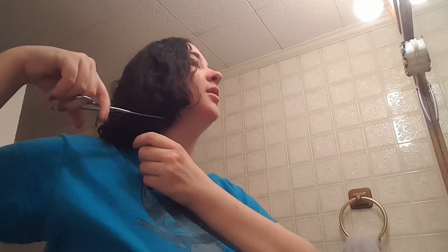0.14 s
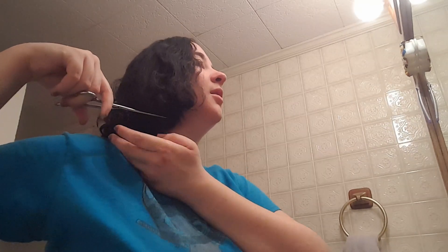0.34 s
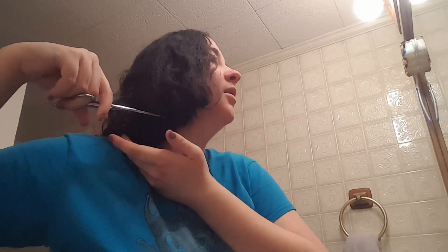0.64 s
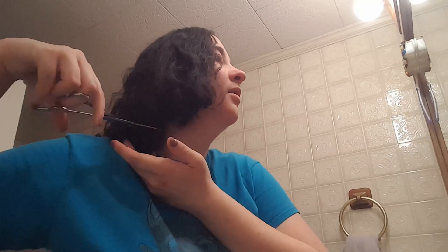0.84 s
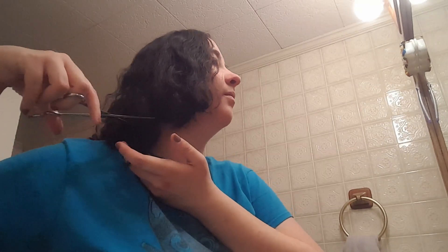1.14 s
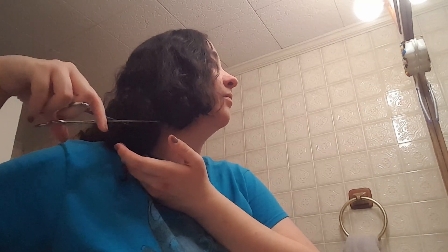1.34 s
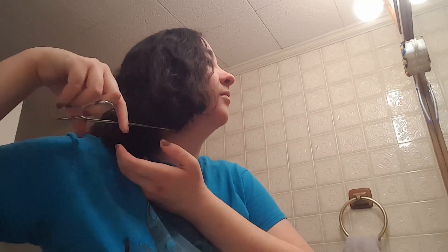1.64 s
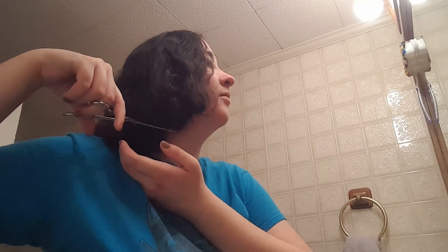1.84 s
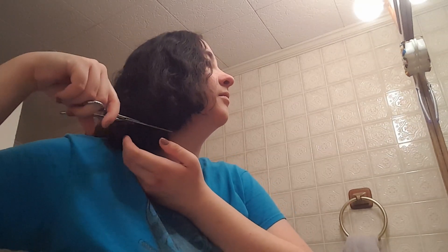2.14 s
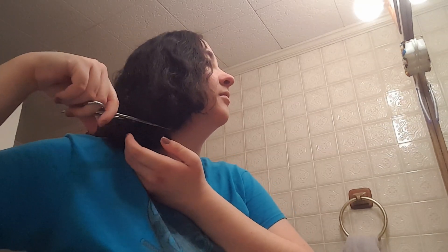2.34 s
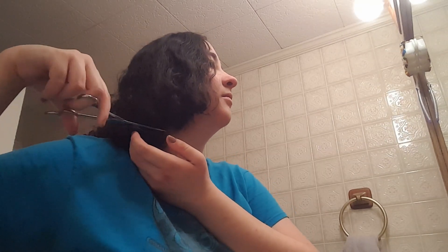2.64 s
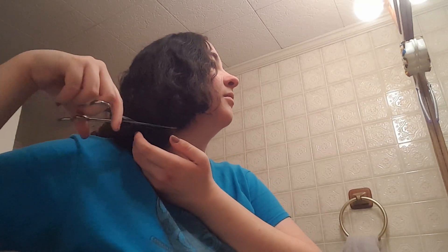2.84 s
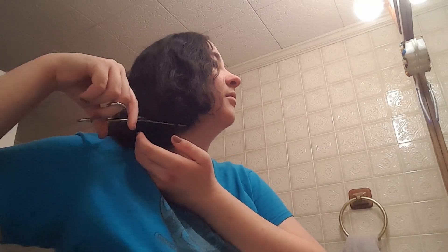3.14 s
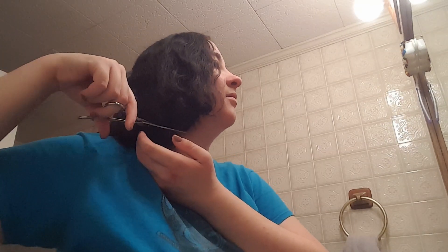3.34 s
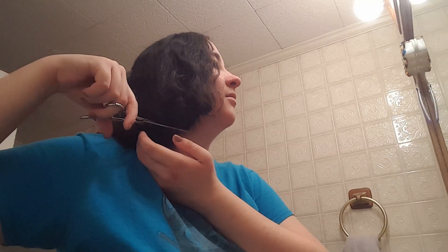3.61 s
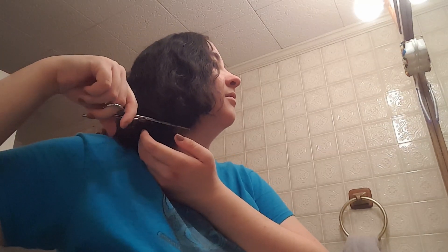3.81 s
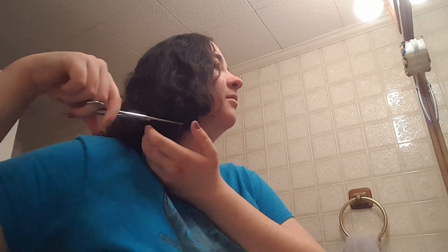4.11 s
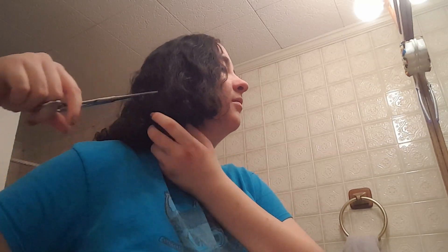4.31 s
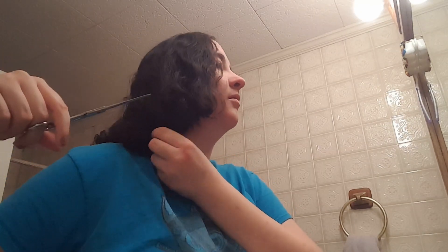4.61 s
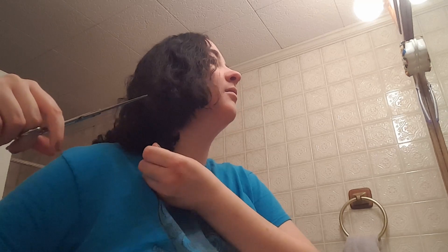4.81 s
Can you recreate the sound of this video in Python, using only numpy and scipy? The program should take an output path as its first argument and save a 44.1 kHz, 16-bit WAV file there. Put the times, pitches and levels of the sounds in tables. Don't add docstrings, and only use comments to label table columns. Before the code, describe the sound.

A quiet small tiled bathroom, with soft steady hiss and very faint low mains hum. From about 0.05 s scissor blades scrape into hair right by the microphone, a thin, bright, uneven crackle of parting strands, catching and growing until a firm metallic snap at 0.65 s. The blades reopen with a light scrape at 0.8-0.95 s, ending in a small pivot click near 0.9 s. From 1.1 s the open blades slide softly over hair while a sleeve rustles low. A second crunching close starts at 1.8 s and ends in the hardest snap at 2.3 s, with brief tile echo. Faint reopening and tiny clicks come around 2.65 s, then near quiet. A slight slide at 3.3-3.5 s leads to a quick rasp and a lighter snap at 3.8 s. Cloth shifts as the arm lowers; two soft, grainy finger brushes through curls follow at 4.2 and 4.6 s, fading out.

```python
import sys
import numpy as np
from scipy import signal
from scipy.fft import rfft, irfft, next_fast_len
from scipy.io import wavfile
from scipy.ndimage import uniform_filter1d

SR = 44100
rng = np.random.default_rng(int(sys.argv[2]) if len(sys.argv) > 2 else 0)


def ratio(d):
    e = np.asarray(d, float) / 20
    return 10 ** e


def transcribe(signal):
    frames = np.atleast_2d(signal).T
    limited = np.clip(frames, -1, 1)
    pcm = np.round(limited * 32767).astype(np.int16)
    wavfile.write(sys.argv[1], SR, pcm)


N = 219088


def evened(x):
    return x / np.sqrt(np.mean(x ** 2) + 1e-20)


def read(points, hz):
    f, value = np.transpose(points)
    return np.interp(np.log(hz + 1), np.log(f + 1), value)


def colour(x, points):
    gain_db = np.maximum(read(points, abs(np.fft.fftfreq(4096, 1 / SR))), -100)
    log_gain = np.log(ratio(gain_db))
    phase = -signal.hilbert(log_gain).imag
    taps = np.fft.ifft(np.exp(log_gain + 1j * phase)).real[:2048]
    return signal.oaconvolve(x, taps[None] / np.linalg.norm(taps), axes=1)[:, :N]


def band(points, lo, hi):
    hz = np.geomspace(50, 17000, 200)
    outside = (hz < lo) | (hz > hi)
    return np.transpose([hz, read(points, hz) - 60 * outside])


def drift(count, hz):
    size = next_fast_len(N)
    steps = rfft(rng.standard_normal((count, size)))
    slowed = steps / (1 + (np.fft.rfftfreq(size, 1 / SR) / hz) ** 4)
    return evened(irfft(slowed, size)[:, :N])


def swells(rows, rise_s, sag_db):
    t, out = np.arange(N) / SR, 0
    for start, length, db in rows:
        sag = sag_db * np.clip((t - start) / length, 0, 1)
        edge = np.clip(np.minimum(t - start, start + length - t) / rise_s, 0, 1)
        out = out + ratio(db + sag) * edge ** 2
    return out


def glide(x, hz, width):
    turn = np.exp(2j * np.pi * np.cumsum(hz) / SR)
    r = np.exp(-1.5 * np.pi * width / SR)
    gain = np.sqrt(2 * (1 - r * r) ** 3 / (1 + r * r))
    return gain * (turn * signal.lfilter([1], [1, -2 * r, r * r], x / turn)).real


def ring(x, modes, aim_db):
    t, body = np.arange(4096) / SR, np.zeros((2, 4096))
    for hz, width, db in modes:
        phase = rng.uniform(0, 2 * np.pi, (2, 1))
        aim = aim_db * rng.uniform(-1, 1) * np.array([[1], [-1]])
        decay = width * np.exp(-np.pi * width * t)
        body += ratio(db + aim) * decay * np.sin(2 * np.pi * hz * t + phase)
    return signal.oaconvolve(x, body / np.linalg.norm(body) * np.sqrt(2), axes=1)[:, :N]


# freq_hz, level_db (per Hz)
HISS_TONE = [(12, -27.5), (25, -13), (50, -2), (80, 0), (160, 0.5), (250, -1), (500, -4.5), (1000, -8.5),
             (2000, -10.5), (4000, -16.5), (8000, -22.5), (10500, -23.5), (13000, -19.5), (15700, -18)]
# freq_hz, likeness (-1 to 1)
PORT_LIKENESS = [(60, 0.056), (180, 0.26), (550, -0.26), (1650, 0.06), (4970, 0.18), (15000, -0.32)]


def hiss(level_db=-63.5):
    frames, hz = N // 256 + 5, np.fft.rfftfreq(1024, 1 / SR)
    a, b, c, d, patches = rng.standard_normal((frames, 513, 5)).T
    patches = evened(uniform_filter1d(uniform_filter1d(patches, 12, 0), 14, 1))
    same = np.clip(read(PORT_LIKENESS, hz), -1, 1)[:, None]
    left = a + 1j * b
    right = same * left + np.sqrt(1 - same ** 2) * (c + 1j * d)
    spectra = np.array([left, right]) * ratio(read(HISS_TONE, hz)[:, None] + .8 * patches)
    return ratio(level_db) * evened(signal.istft(spectra, nperseg=1024, noverlap=768)[1][:, :N])


# freq_hz, level_db (rms), waver_db, waver_hz
MAINS_LINES = [(60, -75, 3.5, .6), (120, -64, 2.2, 1.8)]


def hum():
    out = np.zeros(N)
    for hz, db, waver_db, waver_hz in MAINS_LINES:
        swell, bend = drift(2, 6)
        phase = 2 * np.pi * np.cumsum(hz + waver_hz * bend) / SR
        out += ratio(db + waver_db * swell) * np.sqrt(2) * np.sin(phase)
    return out * ratio(np.array([[.2], [-.2]]))


def blades(drive, modes, wander, bend=.012, fickle_db=3.0):
    near_drive = uniform_filter1d(1. * (abs(drive) > 1e-6), 2001)
    at = np.flatnonzero(near_drive > 1e-4)
    share = np.array([ratio(db) * np.sqrt(width) for hz, width, db in modes])
    out = np.zeros((2, N))
    for (hz, width, db), part in zip(modes, share / np.linalg.norm(share)):
        pull, swell = np.roll(wander, rng.integers(N), 1)[:, at]
        tone = part * glide(drive[at] * ratio(fickle_db * swell), hz * (1 + bend * pull), width)
        out[:, at] += [np.roll(tone, rng.integers(10, 40)), tone]
    return out


# time_s, pressure_db, reach (contact point, pivot 0 to tip 1)
BLADE_STROKES = [
    [(.05, -82, 0), (.157, -79, 0.17), (.3, -65, 0.34), (.35, -67.5, 0.82), (.42, -59, .4),
     (.524, -61, 0.77), (.582, -66.5, 0.8), (.632, -57.5, 1), (.64, -47.5, 0.83), (.6495, -35, 0.53)],
    [(.8, -78, 0.58), (.87, -72.5, 0.43), (.91, -78, 0.56), (.96, -104, .5)],
    [(1.1, -83.5, .5), (1.4, -80, 0.53), (1.8, -80, .5)],
    [(1.8, -78, 0.43), (1.86, -69, 0.22), (1.97, -59, 0), (2.08, -58.5, .5), (2.162, -54, 0.4),
     (2.232, -63.5, 0.65), (2.284, -53.5, 0.82), (2.2965, -36.5, 1.1)],
    [(2.6, -83.5, 0.6), (2.64, -75.5, 0.44), (2.69, -77, 0.42), (2.73, -102, .5)],
    [(3.26, -83.5, .5), (3.38, -82, 0.46), (3.48, -85, .5)],
    [(3.63, -104, 0.53), (3.65, -66.5, 0.61), (3.715, -69, 0.34), (3.754, -87, .6), (3.775, -66, .6),
     (3.797, -57.5, 0.9), (3.8175, -36.5, 0.72)],
]
# opening (1) or closing (0), then handle loops_db, first_mode_db, second_mode_db,
# high_modes_db (re the middle modes at half reach)
STROKE_GRIP = [(0.48, -9.5, -1, -3, -2.5), (.87, -4, 7.5, -3.5, -2.5), (1, 3.5, -4, -5, -2),
               (0.23, -20, -3, -2, -0.5), (0.97, 4, 7.5, 3, -2), (1, -3.5, -0.5, -19, -5),
               (0.2, -7, 4, 1.5, -1)]
# loops_db, first_mode_db, second_mode_db, high_modes_db
REACH_TILT = [-15, -8.5, 6, 4.5]
# time_s, jump_db, fade_s
EDGE_SLIPS = [(0.113, 13, 0.041), (.161, 14, 0.013), (.183, 8, 0.011), (0.234, 11.5, .03),
              (0.352, 11, .012), (0.369, 8.5, 0.056), (0.469, 9.5, 0.0093), (0.526, 13.5, 0.013),
              (0.56, 13, 0.018), (.585, 15, 0.015), (.609, 9.5, 0.047), (0.835, 9, 0.025),
              (1.986, 10.5, 0.01), (2.005, 4, 0.013), (2.031, 5.5, 0.023), (2.082, 6.5, 0.0067),
              (2.115, 9, 0.029), (2.168, 5.5, 0.0059), (2.221, -3, 0.0074), (2.234, 15, 0.039),
              (2.612, 13.5, 0.021), (3.299, 16.5, 0.016), (3.338, 17.5, .02), (3.382, 18, 0.022),
              (3.643, 9, 0.0071), (3.65, 9, 0.0093), (3.685, 11, 0.0067), (3.7, 17, 0.0065),
              (3.756, 19, 0.009), (3.773, 8.5, 0.0089)]
# freq_hz, width_hz, level_db
HANDLE_LOOPS = [(990, 85, -3), (1146.4, 40, -1.5)]
# freq_hz, width_hz, level_db
CLOSING_MODES = [
    [(2250, 130, -7), (2560, 170, 0), (2750, 110, -2)],
    [(3490, 130, 0)],
    [(5400, 200, -8), (6150, 250, 1), (7350, 200, -2), (8450, 200, -3), (8850, 150, -2), (9550, 200, -6)],
    [(11550, 150, -10), (13100, 200, -4), (13650, 200, 0), (14150, 200, -3), (15000, 300, -4)],
]
# freq_hz, width_hz, level_db
OPENING_MODES = [
    [(2520, 120, -3), (2670, 100, 0)],
    [(3470, 120, 0)],
    [(4400, 300, -6), (6070, 140, 3), (6500, 300, -9), (7200, 300, -9), (8200, 250, -5), (9450, 150, -7)],
    [(11800, 200, 0), (13000, 300, -4), (14200, 400, -3), (15200, 300, -3)],
]
GROUP_EDGES = [0, 3100, 4300, 10600, 20000]
DIRECT_GRIT = [-6, -8, -2.5, -4]
# freq_hz, level_db (per Hz)
GRIT_TONE = [(500, -32), (1000, -17.5), (1600, -18), (2500, -5.5), (3100, -13), (3500, -9), (4300, -12.5),
             (5100, -13.5), (6300, -9), (8800, -9), (10700, -20), (11700, -7.5), (15300, -10.5),
             (15900, -36.5)]
# start_s, end_s, from_hz, to_hz, level_db (re high modes)
TIP_GLIDES = [(.11, .3, 11700, 11600, 1), (.385, .52, 12300, 11450, 4), (.37, .47, 13300, 14200, 0),
              (.83, .9, 11200, 12200, 4), (1.815, 1.96, 11200, 12600, 6), (2.0, 2.1, 11750, 11500, 1),
              (2.125, 2.285, 12300, 10900, 4), (2.61, 2.68, 11200, 12400, 3), (3.33, 3.44, 11600, 13000, 6),
              (3.76, 3.81, 12900, 13000, 2)]


def scrape(per_s=3500, spread_db=3.2, tip_width=90):
    t, level_db, opening = np.arange(N) / SR, np.full((5, N), -200.), np.zeros(N)
    for rows, (way, *grip_db) in zip(BLADE_STROKES, STROKE_GRIP):
        s, press_db, reach = np.transpose(rows)
        loop, first, second, high = [db + tilt * (reach - .5) for db, tilt in zip(grip_db, REACH_TILT)]
        on = (t >= s[0]) & (t < s[-1])
        level_db[:, on] = [np.interp(t[on], s, press_db + db) for db in (first, second, 0, high, loop)]
        opening[on] = way
    jump_db = sum(db * np.exp(-np.maximum(t - s, 0) / abs(fade)) * (t > s) for s, db, fade in EDGE_SLIPS)
    size = ratio(spread_db * np.minimum(rng.exponential(1, N), 5)) * rng.choice([-1, 1], N)
    clicks = evened(size * (rng.random(N) < per_s / SR))
    clicks = clicks * ratio(jump_db + 1.8 * drift(1, 60)[0])
    drive, wander = clicks * ratio(level_db), drift(2, 24)
    out = blades(drive[4], HANDLE_LOOPS, wander)
    for k in range(4):
        out += blades(drive[k] * (1 - opening), CLOSING_MODES[k], wander)
        out += blades(drive[k] * opening, OPENING_MODES[k], wander)
        late = np.array([np.roll(drive[k], 26), drive[k]]) * ratio(.3 * jump_db)
        out += ratio(DIRECT_GRIT[k]) * colour(late, band(GRIT_TONE, *GROUP_EDGES[k:k + 2]))
    tip = np.zeros(N)
    for start, end, hz0, hz1, db in TIP_GLIDES:
        at = slice(round(start * SR), round(end * SR))
        u = (t[at] - start) / (end - start)
        push = drive[3, at] * ratio(db) * np.sqrt(abs(np.sin(np.pi * u)))
        tip[at] += glide(push, hz0 + (hz1 - hz0) * u, tip_width)
    return ratio(-2) * (out + np.array([np.roll(tip, 9), tip]))


# freq_hz, t60_s
TILE_DECAY = [(200, 0.11), (1000, 0.27), (2600, 0.21), (6000, 0.22), (12000, .16)]


def tiles(x):
    taps = np.zeros((2, SR // 3))
    at = np.arange(150, SR // 3 - 20, 20) + rng.integers(0, 20, (2, (SR // 3 - 151) // 20))
    np.put_along_axis(taps, at, rng.choice([-1., 1.], at.shape), 1)
    hz, t, z = signal.stft(taps, SR, nperseg=128)
    tail = signal.istft(z * ratio(-60 * t / read(TILE_DECAY, hz)[:, None]), SR, nperseg=128)[1]
    return signal.fftconvolve(x, tail / np.linalg.norm(tail[0]), axes=1)[:, :N]


# start_s, length_s, level_db
SLEEVE_MOVES = [
    (.08, 0.75, -66),
    (1.1, 1.45, -65.5),
    (2.5, 0.89, -80.5),
    (3.6, 0.35, -71.5),
    (3.92, 0.72, -70),
    (4.64, 0.44, -73.5),
]


def sleeve():
    noise = grain()
    sos = signal.butter(2, [250, 520], "band", fs=SR, output="sos")
    cloth = signal.sosfilt(sos, noise + 0.16 * noise[::-1])
    return swells(SLEEVE_MOVES, rise_s=.053, sag_db=-3.5) * evened(cloth)


def grain():
    return rng.standard_normal((2, N)) * ratio(1.2 * drift(1, 40))


# time_s, blow_db, left_right_db, ring_db (re blow)
BLADE_SNAPS = [
    (.6497, -13.5, -1, -8),
    (2.2969, -10.8, -2.5, -9),
    (3.8181, -18.5, 0.5, -19),
]
# freq_hz, level_db (per Hz)
SNAP_TONES = [
    [(60, -59), (120, -19.5), (1000, -40), (1400, -34), (2100, -8), (2600, -1), (3300, -14.5), (4500, -12),
     (6300, -9), (7650, -12), (10500, -11.5), (13300, -4.5), (15500, -16), (16500, -33.5)],
    [(60, -48.5), (120, -27.5), (500, -24), (800, -27), (1100, -28), (1700, -24), (2600, 0), (3400, -20),
     (4680, -8), (5600, -14.5), (9300, -11.5), (13500, -13.5), (15500, -17.5), (16500, -38.5)],
    [(60, -40), (120, -13), (850, -38), (1140, -32), (1400, -30), (1900, -13), (2450, 2), (2900, -13),
     (4300, -14.5), (6000, -4), (7000, -14.5), (8300, -8), (10000, -11.5), (14000, -7.5), (16500, -30.5)],
]
# freq_hz, width_hz, level_db
SHUT_MODES = [(2270, 120, -9), (2530, 90, -1), (2700, 90, 0), (4650, 150, -9), (6400, 200, -10),
              (9250, 200, -8), (10400, 200, -10), (11800, 200, -8), (13100, 200, -8), (13900, 200, -8)]


def snaps(rattle_s=.0024, after_s=.005, after_db=-8, alike=-.15):
    out, u = np.zeros((2, N)), np.arange(2000) / SR
    rattle, crunch = np.minimum(u / 0.00061, 1), ratio(after_db) * np.exp(-u / after_s)
    shape = np.where(u < rattle_s, rattle, crunch)
    fade = np.minimum(1, 20 - 20 * u / u[-1])
    for (s, db, pan_db, ring_db), crack in zip(BLADE_SNAPS, SNAP_TONES):
        noise, drive = rng.standard_normal((2, len(u))), np.zeros((2, N))
        noise[1] = alike * noise[0] + np.sqrt(abs(1 - alike ** 2)) * noise[1]
        burst = rfft(shape * noise)
        power = abs(burst) ** 2
        burst *= np.sqrt(power.mean() / uniform_filter1d(power, size=25))
        burst[1, :40] = burst[0, :40]
        blow = ratio(db + pan_db * np.array([[.5], [-.5]]))
        drive[:, round(s * SR):][:, :len(u)] = blow * irfft(burst) * fade
        out += colour(drive, crack) + ratio(ring_db) * ring(drive, SHUT_MODES, 1.5)
    return out


# time_s, level_db, kind (at the stop 0, midway 1)
PIVOT_TICKS = [
    (0.892, -43.5, 0),
    (2.657, -52.5, 1),
    (2.683, -54, 0),
]
# freq_hz, width_hz, level_db
PIVOT_MODES = [
    [(2640, 230, -6), (5630, 87, 10), (8160, 200, 2), (8600, 80, -31), (9440, 67, -8), (11700, 170, -12),
     (14700, 300, -21)],
    [(6000, 200, -2), (8000, 200, -18), (11500, 150, -7), (14200, 300, -0.5)],
]


def ticks():
    out = np.zeros((2, N))
    for s, db, kind in PIVOT_TICKS:
        drive = np.zeros((1, N))
        drive[0, round(s * SR):][:150] = ratio(db) * rng.standard_normal(150) * np.hanning(150)
        out += ring(drive, PIVOT_MODES[round(kind)], 1.2)
    return out


# start_s, length_s, level_db
BLADE_DRAG = [
    (1.1, 0.756, -70.5),
]
# freq_hz, level_db (per Hz)
BLADE_DRAG_TONE = [(1500, -30), (2600, -2.5), (3500, -8), (4500, 0), (5600, -12.5), (7200, -13), (9000, -8),
                   (10500, -21)]


def drag():
    return swells(BLADE_DRAG, rise_s=.068, sag_db=-1.1) * colour(grain(), BLADE_DRAG_TONE)


# start_s, length_s, level_db
FINGER_STROKES = [
    (4.22, 0.31, -58.5),
    (4.57, 0.35, -60.5),
]
# freq_hz, level_db (per Hz)
FINGER_TONE = [(470, -27), (800, -1.5), (874, -3), (1070, -5.5), (2200, -9), (2950, -1.5), (12800, -12),
               (15700, -18), (16500, -34)]


def fingers():
    return swells(FINGER_STROKES, rise_s=.073, sag_db=-14.5) * colour(grain(), FINGER_TONE)


def scene():
    cut, snap = scrape() + ticks(), snaps()
    echo = tiles(ratio(-5.0) * cut + ratio(-5) * snap)
    return hiss() + hum() + cut + echo + sleeve() + snap + drag() + fingers()


def roll_off(x):
    return signal.sosfilt(signal.butter(12, 16980, fs=SR, output="sos"), x)


def record(dry):
    lowpass = signal.firwin(511, 15950, window=("kaiser", 9), fs=SR)
    low = signal.oaconvolve(dry, lowpass[None], "same")
    loud = uniform_filter1d((dry ** 2).mean(0), 128) > ratio(-46)
    top = (dry - low) * uniform_filter1d(1. * loud, 128)
    return roll_off(low + top - .0008)


dry = scene()
out = record(dry)
transcribe(out)
```